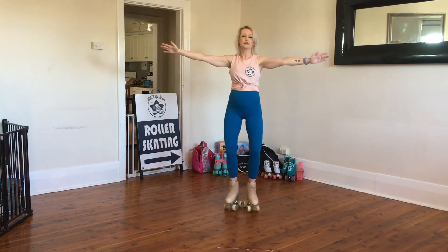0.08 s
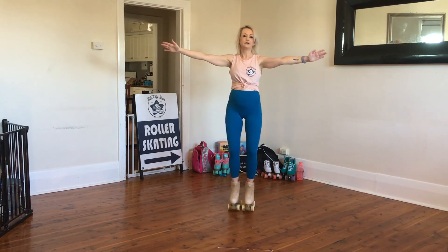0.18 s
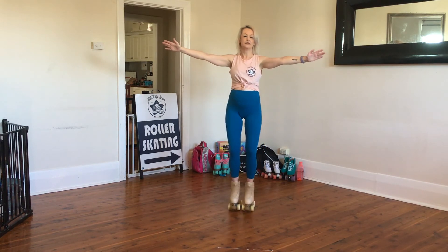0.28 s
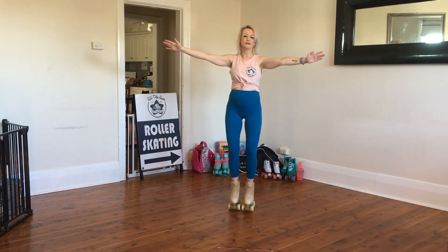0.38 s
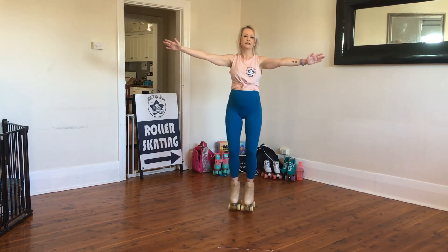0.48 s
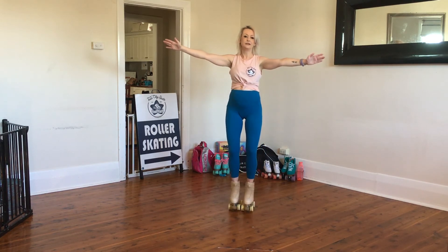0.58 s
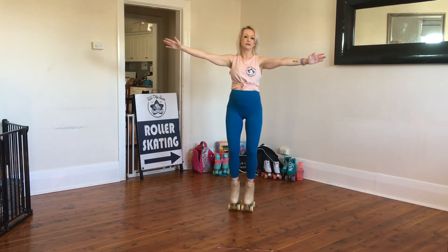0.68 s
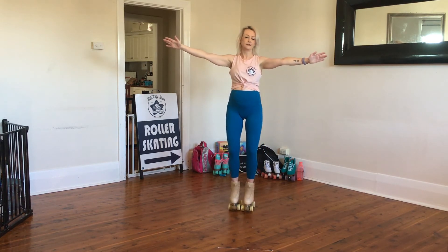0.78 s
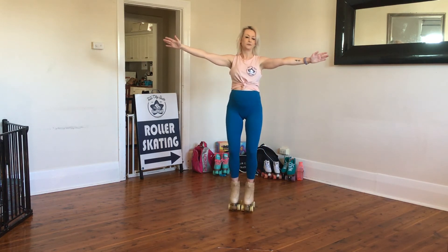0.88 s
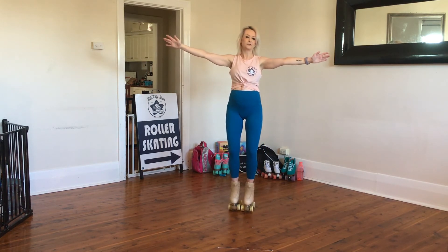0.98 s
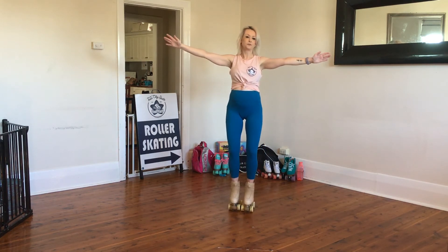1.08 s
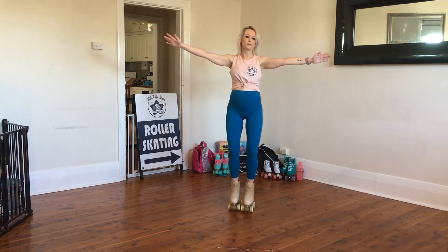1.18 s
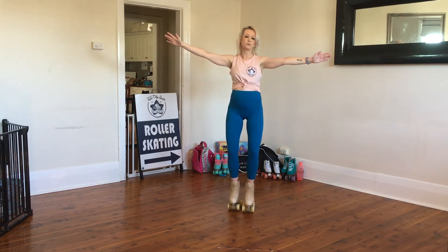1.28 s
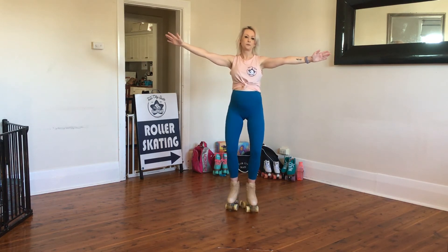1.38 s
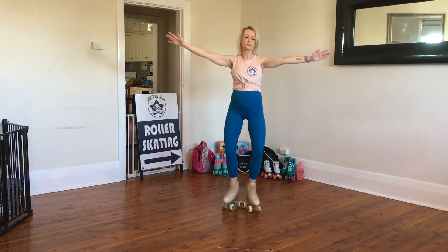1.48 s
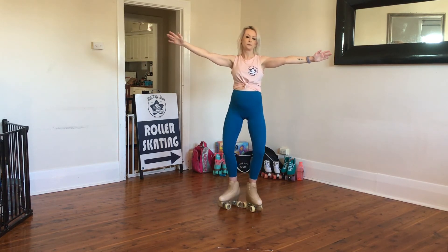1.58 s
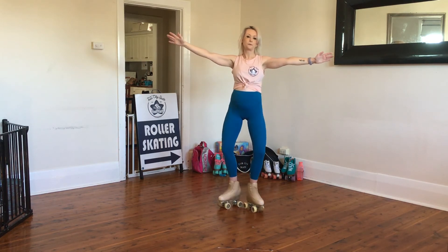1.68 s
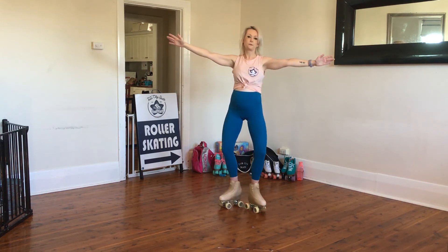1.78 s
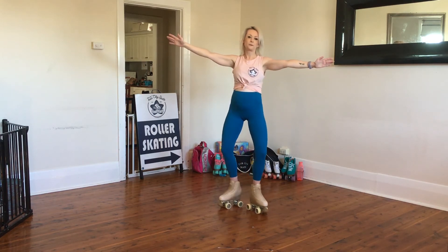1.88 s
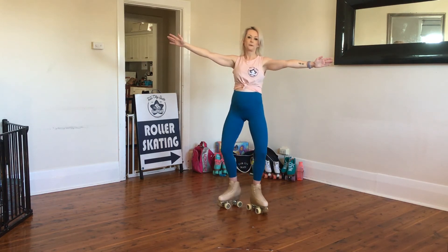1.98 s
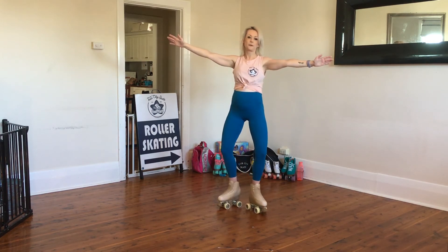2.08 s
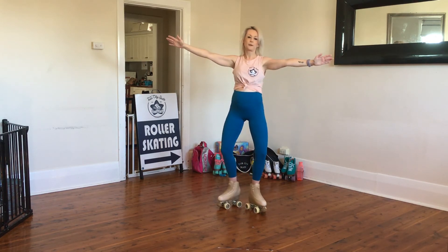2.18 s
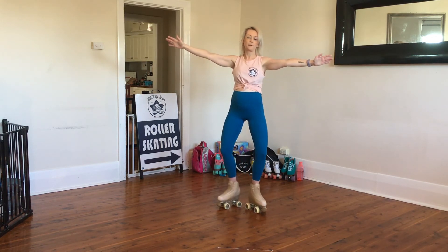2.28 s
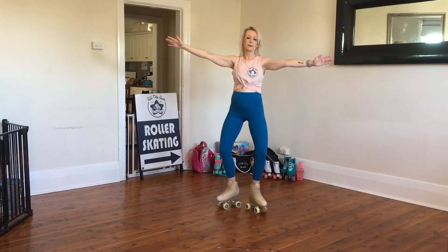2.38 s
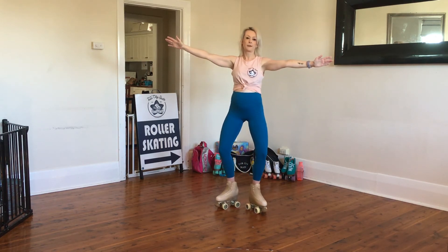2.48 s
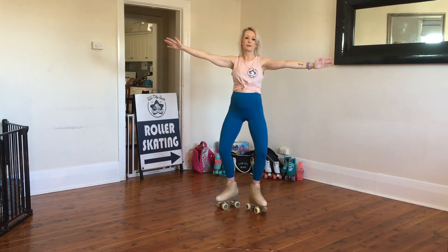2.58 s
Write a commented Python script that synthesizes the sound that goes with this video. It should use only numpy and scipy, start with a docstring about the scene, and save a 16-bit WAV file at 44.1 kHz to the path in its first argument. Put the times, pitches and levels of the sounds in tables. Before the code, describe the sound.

In an empty, reverberant room, a few metres from the microphone, skate wheels roll in and clack hard, the sound rings away to near silence, then low rolling, dull knocks and floor booms return and fade.

```python
"""Quad roller skates on floorboards in a bare, ringing room, heard from a few metres away.
The skates roll together over rumbling boards and clack: filtered impacts, then cracks of noise and decaying modes.
They rest a moment, then swivel apart: the wheels rumble and scuff again and the trucks knock softly in
bursts of coloured noise, while the floor booms in swelling sines. A low hum and faint room noise lie underneath."""
import sys
import numpy as np
from scipy import signal
from scipy.fft import rfft, irfft, next_fast_len
from scipy.io import wavfile
from scipy.ndimage import uniform_filter1d, map_coordinates

SR = 44100
rng = np.random.default_rng(int(sys.argv[2]) if len(sys.argv) > 2 else 0)


def master(y):
    """Save y as 16-bit WAV."""
    cut = np.clip(np.atleast_2d(y).T, -1, 1)
    pcm = np.round(cut * 32767)  # scale
    wavfile.write(sys.argv[1], SR, pcm.astype(np.int16))


N = 114660  # samples, 2.6 s


def amp(db):
    """Decibels to gain."""
    return 10 ** (np.asarray(db) / 20)


def unit(x):
    """Scale to rms 1."""
    return x / np.sqrt(np.mean(x ** 2) + 1e-20)


def along(points, hz):
    """Values at hz, interpolated between (Hz, value) points on a log frequency axis."""
    f, v = np.transpose(points)
    return np.interp(np.log(hz + 1), np.log(f + 1), v)


def clock():
    """Time of each sample in seconds."""
    return np.arange(N) / SR


def wobble(rate):
    """A smooth random curve with rate knots a second."""
    return map_coordinates(rng.standard_normal(256), [clock() * rate], mode="wrap")


def filtered(x, response):
    """Multiply the spectrum of x by a response of frequency."""
    m = next_fast_len(N + SR // 2)
    return irfft(rfft(x, m) * response(np.fft.rfftfreq(m, 1 / SR)), m)[:N]


def noise(colour):
    """Coloured noise of rms 1."""
    return unit(filtered(rng.standard_normal(N), lambda hz: amp(along(colour, hz))))


def swells(rows):
    """Gain of bell-shaped swells from (s, dB, length) rows; length is the bell's standard deviation."""
    return sum(amp(db) * np.exp(-.5 * ((clock() - s) / length) ** 2) for s, db, length in rows)


def level(rows):
    """Gain along an (s, dB) curve."""
    return amp(np.interp(clock(), *np.transpose(rows)))


def room(x):
    """A fresh diffuse tail of random reflections builds up, then each frequency dies at its own speed."""
    # How long the bare room rings. Each row: frequency in Hz, time to fall 60 dB in s.
    decay_times = [(60, 0.75), (200, 0.36), (400, 0.79), (800, 0.76), (1500, 0.93), (3800, 0.86),
                   (5500, 0.79), (7500, 0.55), (11000, 0.43), (15000, 0.27)]
    build_s = 0.001
    hz, t, z = signal.stft(rng.standard_normal(SR), SR, nperseg=256)
    t60 = along(decay_times, hz)[:, None]
    tail = signal.istft(z * amp(-60 * t / t60), SR, nperseg=256)[1]
    tail = tail * (1 - np.exp(-np.arange(len(tail)) / SR / build_s))
    return signal.fftconvolve(x, tail / np.linalg.norm(tail))[:N]


def clack():
    """The wheels meet in a quick flurry; each contact cracks as noise and rings the skate's decaying modes."""
    # Wheels knocking together. Each row: start in s, ring level in dB, crack level in dB, both before the mix.
    contacts = [(0.2288, -33.5, -37), (0.234, -25.5, -25.5), (0.2459, -16.5, -24.5), (.258, -28, -31),
                (.282, -27.5, -50), (.346, -38.5, -35)]
    # What wheel and boot ring with. Each row: frequency in Hz, relative level in dB, time to fall 60 dB in s.
    skate_modes = [(392.6, -1, 0.14), (407, -7.5, 0.25), (456.4, 0, 0.1), (525.2, -10, 0.19),
                   (770.9, -0.5, 0.14), (790.5, -5, 0.17), (829.6, -5, 0.14), (945.5, -13, 0.24),
                   (997, -23.5, 0.51), (1187, -15, 0.22), (1940, -20, 0.15), (2090, -15.5, 0.083),
                   (2294, -21.5, 0.16), (2556, -18.5, .1), (3200, -24.5, .2)]
    # Colour of the crack. Each row: frequency in Hz, relative level in dB.
    crack_colour = [(150, -14), (280, -30), (420, -10), (620, -3), (900, 2), (1400, -1.5), (1800, -6),
                    (2600, -5.5), (3700, -7), (4600, -15), (5500, -11), (6100, -16), (7000, -11.5),
                    (7900, -22), (9600, -21.5), (10300, -29.5), (15500, -29.5)]
    ring_attack_s, crack_attack_s, crack_t60_s = 0.0027, 0.00078, 0.072
    ring_direct_db, ring_room_db = -5.5, -6.5
    crack_direct_db, crack_room_db = -6.5, -2
    out = np.zeros(N)
    for s, ring_db, crack_db in contacts:
        t = np.maximum(clock() - s, 0)
        modes = np.zeros(N)
        for hz, db, t60 in skate_modes:
            strength = amp(db + rng.normal(0, 1))  # no two contacts excite a mode alike
            modes += strength * np.exp(-np.log(1000) * t / t60) * np.sin(2 * np.pi * hz * t)
        ring = amp(ring_db) * modes * (1 - np.exp(-t / ring_attack_s))
        crack_envelope = (1 - np.exp(-t / crack_attack_s)) * np.exp(-np.log(1000) * t / crack_t60_s)
        crack = amp(crack_db) * noise(crack_colour) * crack_envelope
        out += amp(ring_direct_db) * ring + amp(ring_room_db) * room(ring)
        out += amp(crack_direct_db) * crack + amp(crack_room_db) * room(crack)
    return out


def bumps():
    """A random train of tiny impacts under the wheels, uneven in strength."""
    bumps_per_s, spread_db = 1500, 1.5
    hits = rng.random(N) < bumps_per_s / SR
    return hits * rng.standard_normal(N) * amp(spread_db * rng.standard_normal(N))


def board_response(f):
    """Floorboards answer as a sum of resonances of alternating sign, dulled above 1200 Hz."""
    # Resonances of the floorboards. Each row: frequency in Hz, width in Hz, relative level in dB.
    boards = [(118, 34, 9), (160, 13, -8.5), (237, 22, -3), (285.6, 79, 1.5), (655, 34, -8.5),
              (910, 55, -30)]
    total = 0
    for k, (centre, width, db) in enumerate(boards):
        damping = 1j * f * width
        total = total + (-1) ** k * amp(db) * damping / (centre * centre - f * f + damping)
    return total / (1 + (f / 1200) ** 4)


def rolling():
    """Small bumps under the wheels drum the resonant boards and crunch faintly as grit."""
    # Swell and fade of the wheels' rumble. Each row: time in s, level in dB before the mix.
    rumble_level = [(0, -55), (.05, -49.5), (.13, -54.5), (.19, -45), (.25, -55), (.37, -54), (.44, -66),
                    (.56, -69.5), (.7, -89), (1.14, -74), (1.18, -51.5), (1.24, -60), (1.28, -47.5),
                    (1.35, -52.5), (1.429, -43.5), (1.6, -44.5), (1.68, -43), (1.78, -44), (1.83, -48),
                    (1.95, -50.5), (2.1, -59), (2.2, -52.5), (2.301, -60), (2.4, -68.5), (2.54, -72.5),
                    (2.6, -58)]
    # Swell and fade of the grit under the wheels. Each row: time in s, level in dB before the mix.
    grit_level = [(0, -54), (.06, -52.5), (.22, -51), (.3, -78), (1.14, -73.5), (1.2, -55.5), (1.28, -71),
                  (1.36, -66), (1.43, -53.5), (1.58, -62.5), (1.68, -46.5), (1.78, -56), (1.85, -74),
                  (1.9, -52), (1.97, -71), (2.07, -74.5), (2.2, -62), (2.35, -78), (2.6, -80)]
    # Colour of the grit. Each row: frequency in Hz, relative level in dB.
    grit_colour = [(60, -15), (200, 1), (330, 4.5), (470, -1.5), (660, -3), (870, -3), (1150, -8),
                   (1400, -12), (2100, -15.5), (3500, -29), (4900, -37), (6500, -27.5), (8000, -38),
                   (15000, -46)]
    board_db, grit_db, grit_room_db = -2, -1.5, -5.5
    drum = filtered(bumps(), board_response)
    # evened out over 50 ms, so that the rolling sets the level
    drum = drum / np.sqrt(np.abs(uniform_filter1d(drum ** 2, size=SR // 20)) + 1e-12)
    crunch = unit(filtered(bumps(), lambda hz: amp(along(grit_colour, hz))))
    grit = level(grit_level) * crunch
    grit_in_room = 0.61 * grit + amp(grit_room_db) * room(grit)
    return amp(board_db) * level(rumble_level) * drum + amp(grit_db) * grit_in_room


def joists():
    """The whole floor booms at its two lowest resonances, swelling sines, when the weight shifts."""
    # The floor flexing under shifts of weight. Each row: centre in s, lowest mode in dB, second mode in dB,
    # length (standard deviation of the swell) in s.
    sways = [(0.19, -47, -57, 0.041), (0.308, -52, -63, 0.043), (0.366, -69, -48.5, 0.022),
             (1.202, -45, -43.5, 0.017), (1.274, -51, -44, 0.019), (1.44, -65, -46, .06),
             (1.725, -55, -64, 0.21), (1.985, -49, -50.5, 0.034), (2.163, -58, -49, 0.017)]
    lowest_hz, second_hz = 54.6, 114.3
    wander_rad = 0.87  # scale of the random drift in phase
    s, low_db, second_db, length = np.transpose(sways)
    out = np.zeros(N)
    for hz, db in [(lowest_hz, low_db), (second_hz, second_db)]:
        phase = 2 * np.pi * hz * clock() + wander_rad * wobble(16)
        out += swells(zip(s, db, length)) * np.sin(phase)
    return out


def knocks():
    """Trucks and wheels take up their play with short, dull bursts of coloured noise."""
    # Soft knocks of the trucks. Each row: start in s, level in dB before attack and room, dull above in Hz,
    # length in s, over which the decay falls by e squared.
    truck_knocks = [(1.159, -57.5, 3750, .045), (1.38, -43, 2310, 0.01), (1.386, -50.5, 2000, 0.071),
                    (1.624, -55, 1390, 0.019), (1.659, -62, 3000, 0.029), (1.664, -46.5, 6000, 0.015),
                    (1.877, -60, 1100, 0.038), (1.915, -57, 1160, .05), (2.106, -55.5, 3100, 0.044),
                    (2.119, -52, 5000, 0.015)]
    # Colour of a knock before dulling. Each row: frequency in Hz, relative level in dB.
    knock_colour = [(100, 0), (450, -6), (660, 8.5), (800, -3), (1150, 1), (1350, -6), (1600, -5),
                    (2050, -2), (2600, -7.5), (3500, -6), (4900, -16), (6800, -5.5), (8000, -20),
                    (15000, -39)]
    slope, attack_s = 11.5, 0.0033  # slope: exponent of the dulling in power
    out = np.zeros(N)
    for s, db, hz, length in truck_knocks:
        t = np.maximum(clock() - s, 0)
        body = unit(filtered(noise(knock_colour), lambda f: 1 / np.sqrt(1 + (f / hz) ** slope)))
        out += amp(db) * body * (1 - np.exp(-t / attack_s)) * np.exp(-2 * t / length)
    return 1.09 * out + room(out)


def scuffs():
    """Wheels rub sideways with a soft, uneven hiss of noise; cloth swishes as the legs move."""
    # Wheels rubbing sideways. Each row: centre in s, level in dB before the mix, length (standard deviation) in s.
    rubs = [(1.06, -79.5, 0.045), (1.16, -78.5, 0.018), (1.46, -76, 0.14), (1.68, -70.5, 0.048),
            (1.76, -91, 0.024)]
    # Colour of the rubbing. Each row: frequency in Hz, relative level in dB.
    rub_colour = [(500, -46), (2000, 3), (3300, 3), (4800, -6), (5600, -2.5), (7000, -5), (7800, -16.5),
                  (10500, -23), (14000, -16), (16000, -41)]
    # Trouser legs sliding. Each row: centre in s, level in dB before the mix, length (standard deviation) in s.
    swishes = [(.15, -66.5, 0.1), (1.44, -74.5, 0.17)]
    # Colour of the cloth. Each row: frequency in Hz, relative level in dB.
    cloth_colour = [(600, 2), (3000, -0.5), (5000, -10), (9000, -11.5), (14000, -16), (16000, -14)]
    wheels = swells(rubs) * noise(rub_colour)
    cloth = swells(swishes) * noise(cloth_colour)
    hiss = (wheels + cloth) * amp(1.6 * wobble(39))  # uneven friction
    return 0.83 * hiss + 0.66 * room(hiss)


def background():
    """Steady coloured noise of the room and an appliance's hum, a single sine."""
    # Colour of the still room. Each row: frequency in Hz, relative level in dB.
    air_colour = [(22, -35), (32, -21), (45, -4.5), (100, -11.5), (200, -16), (430, -23.5), (860, -27),
                  (1270, -31), (2270, -34.5), (4800, -42), (6200, -42), (12400, -46), (15500, -48)]
    air_db, hum_db, hum_hz = -65.5, -62.5, 100.3  # both levels are rms
    hum = np.sqrt(2) * np.sin(2 * np.pi * hum_hz * clock())
    return amp(air_db) * noise(air_colour) + amp(hum_db) * hum


def scene():
    """Everything the microphone hears from a few metres away, in one channel."""
    return (clack() + rolling() + joists() + knocks() + scuffs() + background())[None]


def record(dry):
    """The recorder keeps nothing above its band limit."""
    top_hz = 15700
    return filtered(dry[0], lambda hz: hz < top_hz)[None]


dry = scene()
out = record(dry)
master(out)
```